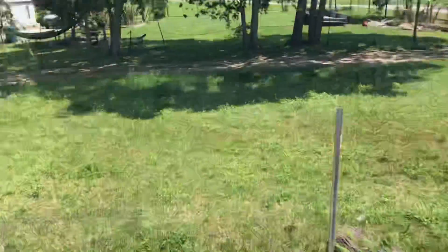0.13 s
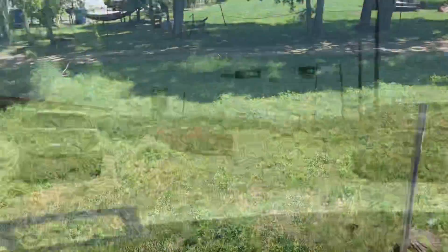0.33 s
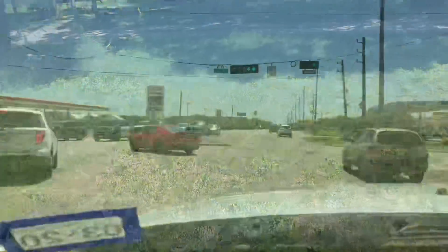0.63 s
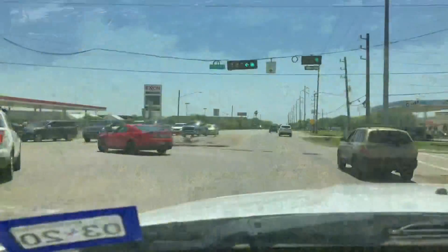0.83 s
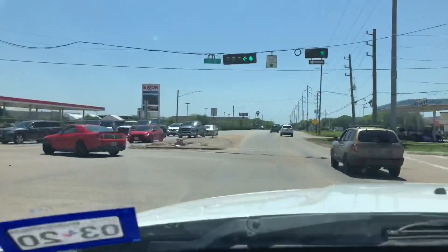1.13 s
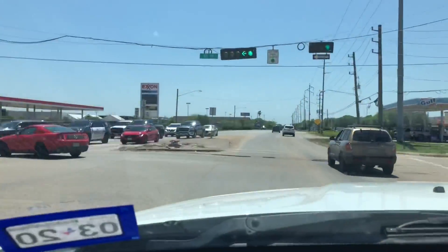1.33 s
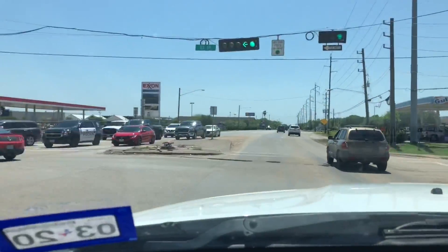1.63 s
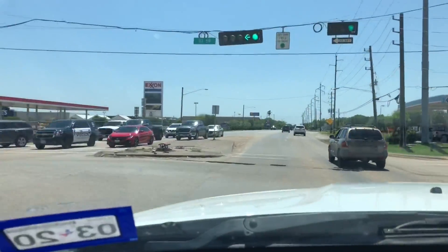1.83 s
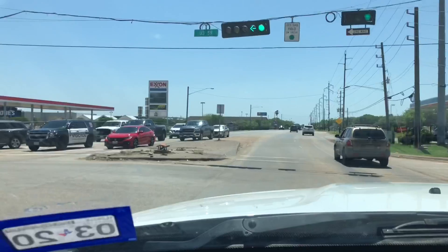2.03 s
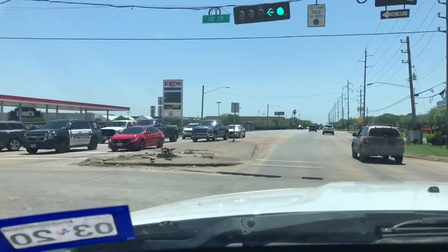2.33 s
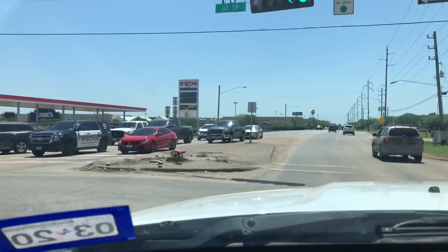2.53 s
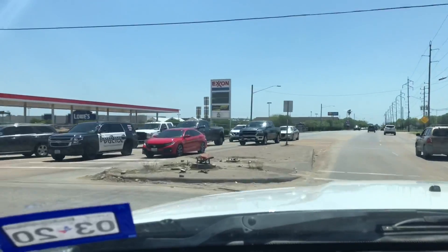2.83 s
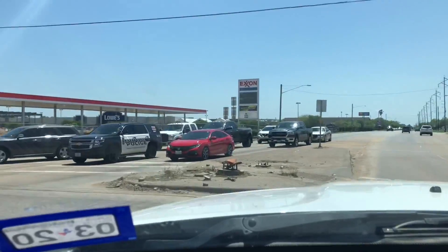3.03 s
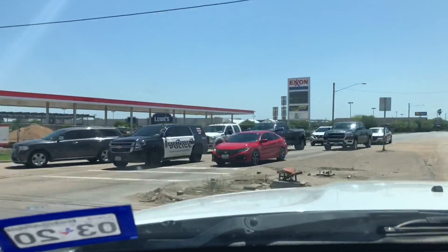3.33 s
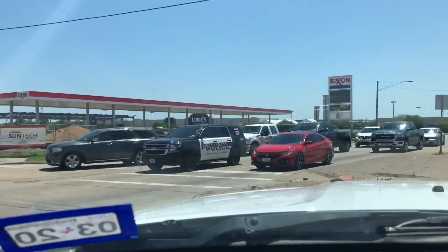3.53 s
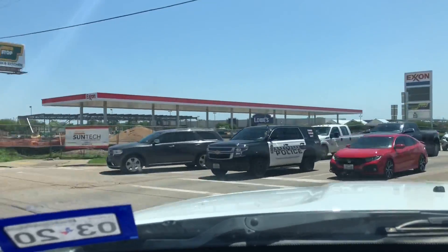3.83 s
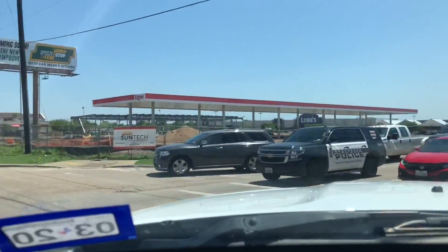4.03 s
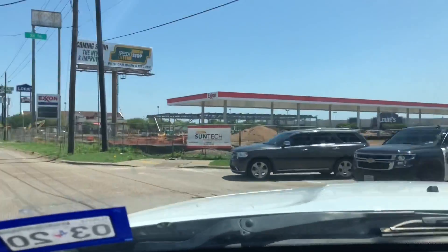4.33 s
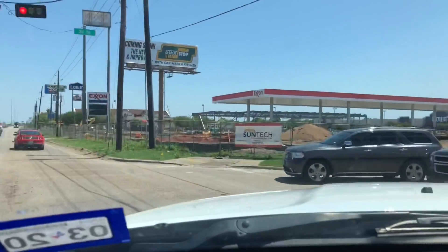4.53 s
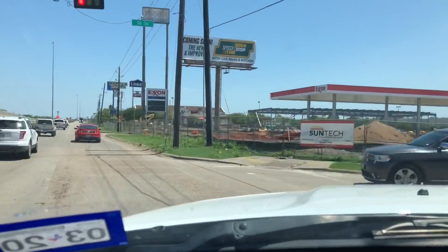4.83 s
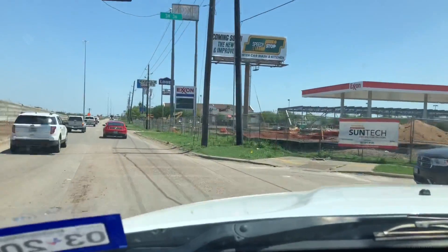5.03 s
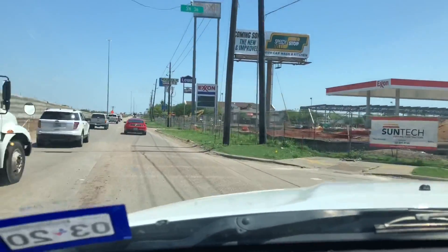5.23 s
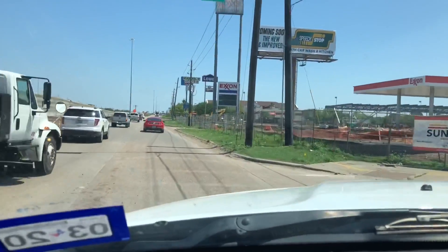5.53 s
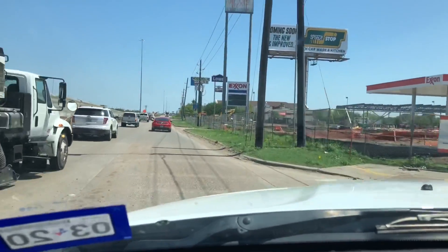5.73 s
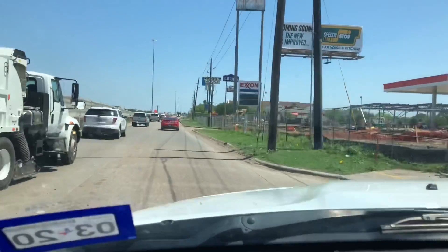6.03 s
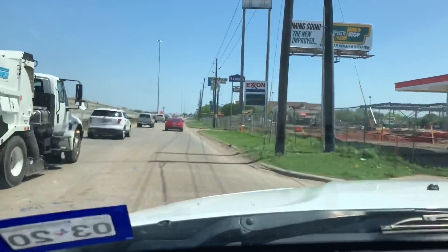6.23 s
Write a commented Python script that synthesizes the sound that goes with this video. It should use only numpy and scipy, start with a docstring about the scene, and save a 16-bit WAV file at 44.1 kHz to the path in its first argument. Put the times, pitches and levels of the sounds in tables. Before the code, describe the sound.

A faint insect rasp and soft outdoor air fade within a second into the cab of a moving diesel pickup. Heard from inside, the engine drone eases off as the truck slows for a turn, over low tyre rumble and bumps. The turn signal ticks steadily and a loose hard object clacks a few times. The ticking stops and the engine rises as the truck pulls away.

```python
"""A diesel pickup, heard from the cab, slows for a junction, turns left and pulls away.
Crank orders and tyres rumble through the cab's air modes; bumps shake the body.
The turn signal relay ticks, and something hard and loose clacks as the truck sways.
At the start an insect rasps over a lawn, which fades into the cab in one second."""
import sys
import numpy as np
from scipy import signal
from scipy.fft import rfft, irfft
from scipy.io import wavfile
from scipy.ndimage import uniform_filter1d

SR = 44100
rng = np.random.default_rng(int(sys.argv[2]) if len(sys.argv) > 2 else 0)


def to_wav(s):
    """Save 16-bit WAV."""
    ch = np.atleast_2d(s).T  # columns
    pcm = np.round(np.clip(ch, -1, 1) * 32767)  # PCM
    wavfile.write(sys.argv[1], SR, pcm.astype(np.int16))


N = 281534
TIME = np.arange(N) / SR

# crankshaft speed: time_s, turns_per_s
CRANK_SPEED = [(0, 32.2), (.4, 31.8), (1.45, 29.8), (1.9, 28.4), (2.35, 26.9), (2.7, 26.1), (3.8, 28.3),
               (4.8, 31), (5.3, 34), (5.9, 36), (6.38, 37.2)]


def from_db(db):
    """Decibels to gain."""
    return 10 ** (np.asarray(db) / 20)


def unit_rms(x):
    """Scale to unit power."""
    return x / np.sqrt(np.mean(x ** 2) + 1e-20)


def curves(rows):
    """Each column after time_s, interpolated to every sample."""
    time_s, *columns = np.transpose(rows)
    return [np.interp(TIME, time_s, column) for column in columns]


def swells(rows):
    """Gain of bell-shaped swells whose powers add."""
    power = sum(from_db(2 * db) * np.exp(-((TIME - mid_s) / half_s) ** 2) for mid_s, db, half_s in rows)
    return np.sqrt(power + 1e-18)


def drift(rate_hz):
    """Slow random wander, unit RMS."""
    hop, settle = 40, 2000
    pole = np.exp(-2 * np.pi * rate_hz * hop / SR)
    noise = rng.standard_normal(N // hop + settle + 2)
    slow = signal.lfilter([1], [1, -2 * pole, pole * pole], noise)[settle:]
    return np.interp(np.arange(N) / hop, np.arange(len(slow)), unit_rms(slow))


def coloured(spectrum):
    """Unit-RMS noise of a given spectrum, falling 20 dB per octave past its ends."""
    hz, db = np.transpose(spectrum)
    octave, points = np.log2(np.arange(N // 2 + 1) * SR / N + 1), np.log2(hz)
    outside = np.abs(octave - np.clip(octave, points[0], points[-1]))
    gain = from_db(np.interp(octave, points, db) - 20 * outside)
    return unit_rms(irfft(rfft(rng.standard_normal(N)) * gain, N))


def steady(x, span_s):
    """Even out the slow swells of a noise."""
    return x / np.sqrt(uniform_filter1d(x ** 2, int(span_s * SR)) + 1e-12)


def resonate(x, modes):
    """Parallel two-pole resonators of alternating sign."""
    out = 0
    for k, (hz, width_hz, db) in enumerate(modes):
        radius = np.exp(-np.pi * width_hz / SR)
        gain = (-1) ** k * from_db(db) * (1 - radius ** 2) / 2
        feedback = [1, -2 * radius * np.cos(2 * np.pi * hz / SR), radius ** 2]
        out = out + signal.lfilter([gain, 0, -gain], feedback, x + 1e-18)
    return out


def blow(modes, contact_s, tail_db, tail_t60_s):
    """One contact: brief chatter, then ever faster dying reflections from glass and trim."""
    t = TIME[:SR // 5]
    attack = 1 - np.exp(-t / .0012)
    chatter = np.exp(-(t / contact_s) ** 2)
    tail = from_db(tail_db - 60 * (t / tail_t60_s) ** 1.45)
    burst = (chatter + tail) * attack * rng.standard_normal(len(t))
    sound = 0
    for k, (hz, width_hz, db) in enumerate(modes):
        ring = unit_rms(resonate(burst, [(hz, width_hz, 0)]))
        sound = sound + (-1) ** k * from_db(db) * np.sqrt(width_hz) * ring
    return sound / np.sqrt(np.sum(sound ** 2) / (.0004 * SR))  # same energy for every blow


def add(track, start_s, sound):
    """Mix a sound in at a time."""
    start = int(start_s * SR)
    track[start:start + len(sound)] += sound[:N - start]


def lawn():
    """An insect's rapid rasping strokes over soft outdoor air, faint tones and a low rumble."""
    # insect resonances, steady outdoor tones: pitch_hz, width_hz, gain_db
    insect_modes = [(8800, 450, -12), (9580, 260, -2), (10130, 200, -7)]
    tone_modes = [(1150, 58, 0), (2770, 130, -6), (4480, 56, -10)]
    # outdoor air and rumble: freq_hz, density_db
    air_spectrum = [(300, -8), (620, 5.5), (850, -5), (1200, -1), (1800, -5), (2700, -7.5), (3500, -9.5),
                    (5300, -13), (7500, -21), (15000, -30)]
    rumble_spectrum = [(70, -8), (95, -2), (160, -1), (230, -8)]
    stroke_hz = 59 * (1 + .01 * drift(3))
    stroke = np.cos(2 * np.pi * np.cumsum(stroke_hz) / SR)
    rasp = stroke ** 4 * (1 + .38 * stroke) + .95
    insect = from_db(-64) * unit_rms(resonate(rasp * rng.standard_normal(N), insect_modes))
    tones = from_db(-56.5) * unit_rms(resonate(rng.standard_normal(N), tone_modes))
    air = from_db(-48.5) * coloured(air_spectrum)
    rumble = from_db(-41) * coloured(rumble_spectrum)
    return insect + tones + air + rumble


def small_sounds():
    """A grainy rustle, as of hands sliding on the wheel, a tiny squeak and a faint high whine."""
    # slides on the wheel: mid_s, level_db, half_length_s
    slides = [(3.318, -53, .008), (3.59, -58.5, 0.055), (3.84, -62, .04), (4.24, -59.5, 0.19),
              (5.24, -61, .07), (6.04, -58.5, 0.055)]
    # rustle: freq_hz, density_db
    rustle_spectrum = [(2000, 0.5), (4000, -6), (8000, -7.5), (15000, -15)]
    # squeak: mid_s, pitch_hz, half_length_s, level_db
    squeak_event = (2.247, 12200, .022, -59)
    rustle = swells(slides) * from_db(2 * drift(90)) * coloured(rustle_spectrum)
    mid_s, pitch_hz, half_s, level_db = squeak_event
    envelope = from_db(level_db) * np.exp(-((TIME - mid_s) / half_s) ** 2)
    squeak = envelope * np.sin(2 * np.pi * pitch_hz * TIME + 2.5 * drift(60))
    whine = from_db(-81 + 1.5 * drift(3.6)) * np.sqrt(2) * np.sin(2 * np.pi * 15625 * TIME)
    return rustle + squeak + whine


def rattle():
    """A loose object rings with the panel it hits; light touches ping one mode; the trim snaps."""
    # hits: start_s, level_db, panel_power_share, contact_s
    clacks = [(1.552, -13, 0.13, 0.0056), (3.366, -17.5, 0.4, 0.0066), (3.678, -13.5, 0.07, 0.0065),
              (4.113, -33, 1, 0.0045), (4.699, -27, 0.5, 0.013), (4.7205, -16.5, 0.9, 0.014),
              (4.7341, -10, 0.88, 0.0059), (4.744, -17.5, 0.9, 0.0047)]
    # touches as it rocks: start_s, pitch_hz, level_db
    touches = [(4.702, 2880, -28), (4.75, 3330, -29), (4.76, 3480, -30), (4.81, 3680, -32.5),
               (4.826, 3650, -36)]
    # trim snaps: start_s, level_db
    snaps = [(1.384, -40), (1.469, -41.5), (2.081, -45), (3.845, -48), (4.158, -29.5), (4.785, -29),
             (5.273, -42)]
    # object, panel and trim resonances: pitch_hz, width_hz, gain_db
    object_modes = [(1000, 400, -8), (2370, 200, 1.5), (3016, 130, 6.5), (3300, 80, 1), (3640, 270, -3.5),
                    (4640, 310, -2), (5650, 130, 5.5), (6150, 190, 1.5), (6910, 170, 5.5),
                    (7900, 310, -4.5), (8240, 220, 0), (9500, 400, -11), (10100, 300, -7),
                    (11500, 500, -9.5), (12600, 450, -9.5), (14500, 1500, -22)]
    panel_modes = [(556, 94, 0), (825, 210, -1), (1220, 380, 2.5), (2010, 130, 2.5), (2230, 77, -1),
                   (2470, 160, 2), (3150, 120, 5), (3750, 200, 0.5), (4400, 140, 4), (5400, 190, -0.5),
                   (6500, 700, -15), (7440, 190, -3), (8000, 700, -6.5), (10300, 1800, -14),
                   (12500, 800, -10.5), (14500, 1800, -17)]
    trim_modes = [(2760, 610, 5), (6560, 1600, 1), (11000, 1800, -4), (14500, 1800, -9)]
    touch_width_hz = 480
    out = np.zeros(N)
    for start_s, db, share, contact_s in clacks:
        clack = blow(object_modes, contact_s, tail_db=-9, tail_t60_s=.08)
        panel = blow(panel_modes, contact_s, tail_db=-7, tail_t60_s=.085)
        add(out, start_s, from_db(db) * (np.sqrt(1 - share) * clack + np.sqrt(share) * panel))
    for start_s, hz, db in touches:
        ping = blow([(hz, touch_width_hz, 0)], contact_s=.004, tail_db=-9, tail_t60_s=.07)
        add(out, start_s, from_db(db) * ping)
    for start_s, db in snaps:
        add(out, start_s, from_db(db) * blow(trim_modes, contact_s=.0015, tail_db=-18, tail_t60_s=.045))
    return out


def relay_clicks():
    """The armature snaps shut and falls back more softly."""
    # relay resonances, closing and opening: pitch_hz, width_hz, gain_db
    close_modes = [(1040, 190, 1), (2280, 280, -0.5), (2640, 63, 6), (3550, 250, -13), (5300, 720, -10.5),
                   (6140, 110, -11.5), (13050, 170, -15)]
    open_modes = [(1040, 130, 4.5), (1630, 150, 3.5), (1960, 180, 1.5), (2330, 200, -4), (3480, 160, -3),
                  (5130, 250, -5), (5410, 240, -0.5), (7830, 400, -13), (10000, 700, -23)]
    tick = from_db(-24.5) * blow(close_modes, contact_s=.006, tail_db=2, tail_t60_s=.06)
    tock = from_db(-27) * blow(open_modes, contact_s=.007, tail_db=3, tail_t60_s=.08)
    return np.array([tick, tock])


def turn_signal():
    """A similar tick and tock each blink; the straightening wheel cuts the last blink short."""
    first_s, period_s, closed_s, cancel_s = .27, .6795, .284, 5.211
    fresh_share = .58  # power that differs from blink to blink
    out, usual = np.zeros(N), relay_clicks()
    for start_s in np.arange(first_s, cancel_s, period_s):
        tick, tock = np.sqrt(1 - fresh_share) * usual + np.sqrt(fresh_share) * relay_clicks()
        add(out, start_s, tick)
        add(out, min(start_s + closed_s, cancel_s), tock)
    return out


def body_motion(bump_gain):
    """The body heaves and shakes; each bump sets the cab's deepest mode booming."""
    # body sway: time_s, level_db
    sway = [(.55, -49), (.8, -35), (1.6, -40), (2.5, -46), (3, -51), (3.7, -35), (4.6, -35), (5.3, -42),
            (5.65, -56), (6, -39), (6.38, -46)]
    # body heave and shake: freq_hz, density_db
    heave_spectrum = [(27, -12), (33, 2), (38, -1), (47, 6)]
    shake_spectrum = [(44, -26), (51, -8.5), (55, -4), (58, 0), (62, -6), (68, -16), (76, -11)]
    boom_hz = 56.83
    heave = from_db(curves(sway)[0]) * steady(coloured(heave_spectrum), span_s=.23)
    boom = np.sqrt(2) * np.sin(2 * np.pi * (boom_hz * TIME + rng.random()) + 1.1 * drift(4))
    shake = from_db(-36) * steady(coloured(shake_spectrum), span_s=.47)
    return heave + bump_gain * boom + shake


def cab_boom(firing):
    """Tyre noise, pulsed by combustion, drives the cab's air modes."""
    # cab air modes: pitch_hz, width_hz, gain_db
    air_modes = [(156.5, 31, -7.5), (188.3, 11.5, 1), (216.9, 16.2, 2), (254.5, 21.8, -0.5),
                 (292.7, 66, -9)]
    drive = coloured([(120, .0092), (330, .017)]) * (1 + .57 * firing)
    return from_db(-.14) * steady(resonate(drive, air_modes), span_s=.26)


def tyre_roar(firing):
    """Tyres roar and set doors and glass ringing, with a slight pulse at the firing rate."""
    # tyre roar: freq_hz, density_db
    spectrum = [(120, 1.5), (300, 1), (400, -3), (520, -5.5), (660, -11), (870, -13), (1250, -20),
                (1550, -26), (2500, -36), (5000, -44.5)]
    # door and glass resonances: pitch_hz, width_hz, gain_db
    body_modes = [(523, 39, -2.5), (808, 26, -0.5), (874, 6.7, 6.5), (1049, 52, -1), (1279, 32, 5)]
    roar = unit_rms(coloured(spectrum) + resonate(coloured(spectrum), body_modes))
    return from_db(2.5) * roar * (1 + .081 * firing)


def ride(turns):
    """The road drives body, cab air and tyres; bumps also thud in the tyre rumble."""
    # road noise: time_s, rumble_db, boom_db, roar_db
    road = [(0, -31.5, -27.5, -37), (2.4, -27.5, -25.5, -36.5), (2.9, -31, -29.5, -36.5),
            (4.3, -29, -29.5, -36), (5.05, -32.5, -29.5, -36.5), (5.4, -30, -26.5, -35),
            (6.38, -28, -30, -34.5)]
    # road bumps: mid_s, level_db, half_length_s
    bumps = [(.6, -28, .07), (.96, -27, 0.049), (1.39, -23.5, 0.057), (1.63, -25.5, 0.04),
             (1.82, -24.5, .04), (2.04, -30, 0.054), (2.42, -26.5, 0.061), (2.58, -23.5, 0.046),
             (2.97, -34, 0.067), (3.46, -31, 0.05), (3.65, -23.5, 0.032), (4.03, -26, 0.037),
             (4.22, -29, 0.071), (4.46, -37, .06), (4.65, -29.5, 0.15), (5.26, -26.5, .07),
             (6.05, -31, .08)]
    # tyre rumble and hiss: freq_hz, density_db
    rumble_spectrum = [(66, -4), (80, 3.5), (100, 2.5), (122, 0), (150, -14), (240, -25.5)]
    hiss_spectrum = [(1000, -39), (1650, 0), (2000, -5.5), (3200, -6.5), (3900, -10.5), (5700, -13),
                     (6600, -16.5), (9200, -22), (16000, -28.5)]
    rumble_db, boom_db, roar_db = curves(road)
    firing = np.cos(2 * np.pi * turns * 3)  # three firings per turn
    bump_gain = swells(bumps)
    body = body_motion(bump_gain)
    rumble_gain = np.hypot(from_db(rumble_db), from_db(-8.5) * bump_gain)
    rumble = rumble_gain * steady(coloured(rumble_spectrum), span_s=.17)
    boom = from_db(boom_db) * cab_boom(firing)
    roar = from_db(roar_db) * tyre_roar(firing)
    hiss = from_db(roar_db - 18.5 + .21 * drift(13)) * coloured(hiss_spectrum)
    return body + rumble + boom + roar + hiss


def engine(turns):
    """Crank orders glide through cab resonances and waver as firings vary; load lifts the upper ones."""
    # drone, loud under engine braking, quiet in the turn: time_s, level_db
    drone = [(0, -26.5), (1.5, -27), (2.4, -29), (2.8, -41), (4.8, -43.5), (5.4, -33.5), (6.38, -30)]
    # crank orders from the second up: gain_db
    orders_db = [-1.5, 5, -2.5, -1, -0.5, 0, -1.5, 0.5, 1.5, 0.5, 3, -2.5, -1, 0, -2, -6.5, 1, -1, -0.5,
                 2.5]
    # path from engine to seat: freq_hz, gain_db
    seat_path = [(58, -5.5), (75, -10), (92, -14.5), (122, -10), (137, -2.5), (160, -1.5), (178, -18.5),
                 (198, -10), (216, -3.5), (235, -13), (256, -5.5), (300, -14), (420, -20.5), (900, -45)]
    throb_db, throb_hz, load_span_s = 1.26, 9.6, .75
    crank_hz, = curves(CRANK_SPEED)
    drone_db = curves(drone)[0] + throb_db * drift(throb_hz)
    accel_hz_per_s = uniform_filter1d(np.gradient(crank_hz) * SR, int(load_span_s * SR))
    path_hz, path_db = np.transpose(seat_path)
    out = 0
    for order, order_db in enumerate(orders_db, 2):
        hz = order * crank_hz
        growl_db = 2 * accel_hz_per_s * np.clip((hz - 220) / 200, 0, 1)
        waver_db, waver_rad = 1.8 * drift(5), (.2 + .02 * order) * drift(8)
        db = order_db + np.interp(hz, path_hz, path_db) + growl_db + waver_db
        out = out + from_db(db) * np.sin(2 * np.pi * (order * turns + rng.random()) + waver_rad)
    return from_db(drone_db) * np.sqrt(2) * out


def scene():
    """The lawn gives way to the cab; mono."""
    fade_s = 1
    turns = np.cumsum(curves(CRANK_SPEED)[0]) / SR
    cab = engine(turns) + ride(turns) + turn_signal() + rattle() + small_sounds()
    fade = np.minimum(TIME / fade_s, 1)
    cab_gain = np.maximum(fade ** 1.19, from_db(-19))
    return (cab_gain * cab + (1 - fade) * lawn())[None]


def record(dry):
    """Brief fades at both ends and a steep low-pass."""
    ease_s, cutoff_hz = .004, 15900
    ease = np.minimum(1, np.minimum(TIME, TIME[::-1]) / ease_s)
    return signal.sosfilt(signal.ellip(10, .1, 80, cutoff_hz, fs=SR, output="sos"), dry * ease)


dry = scene()
out = record(dry)
to_wav(out)
```